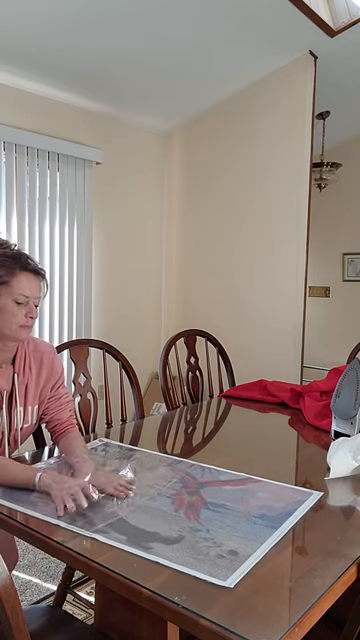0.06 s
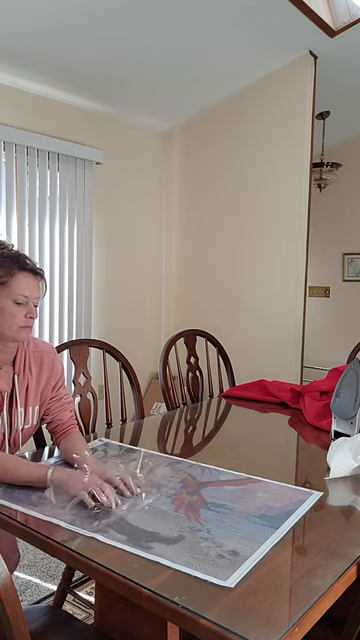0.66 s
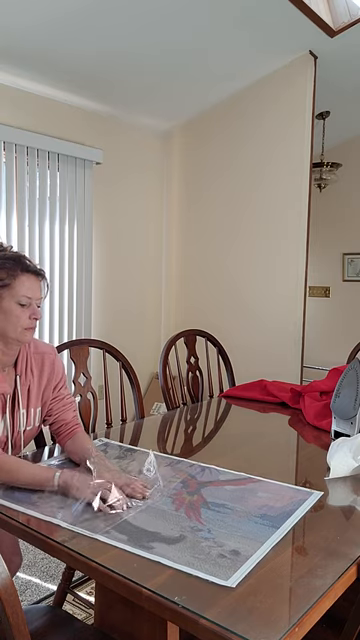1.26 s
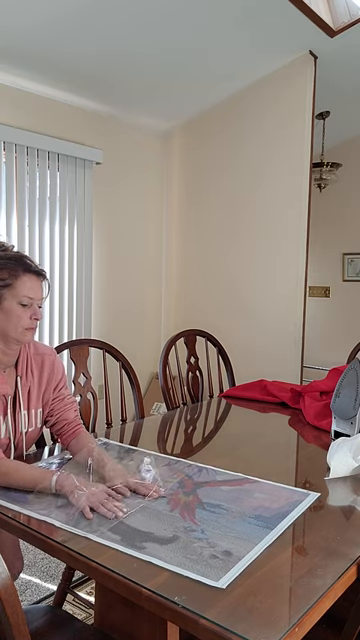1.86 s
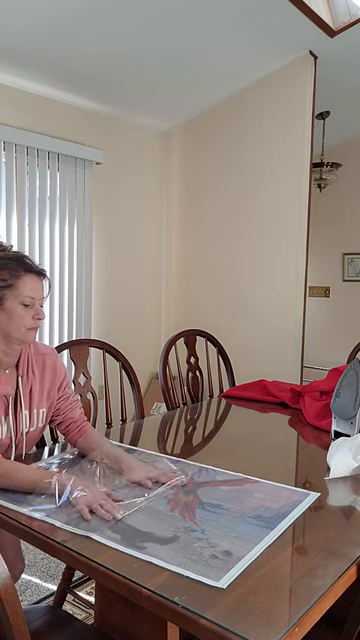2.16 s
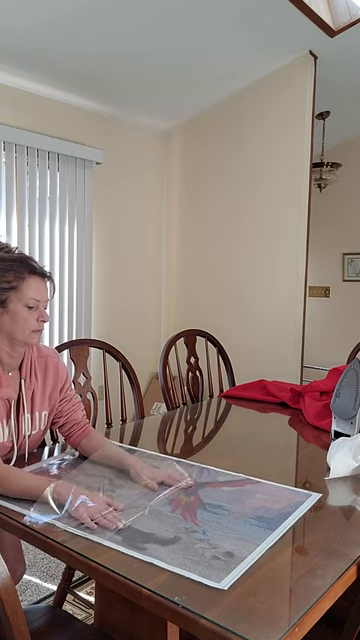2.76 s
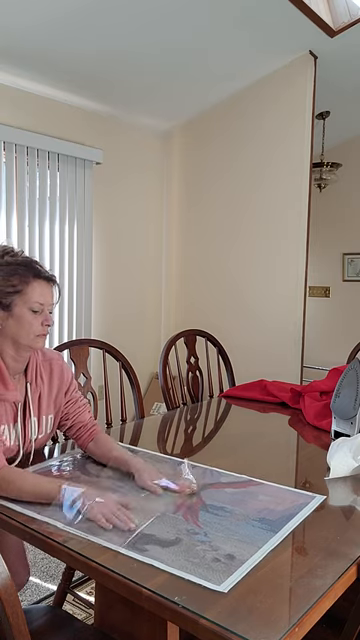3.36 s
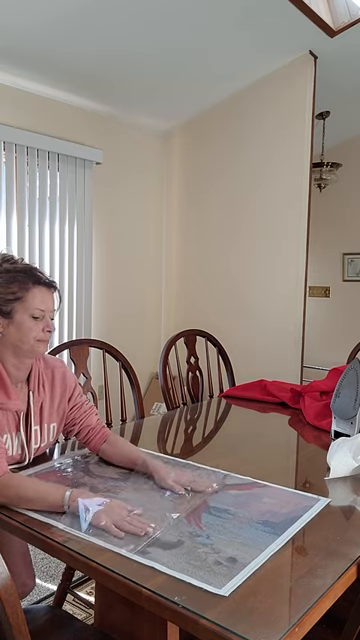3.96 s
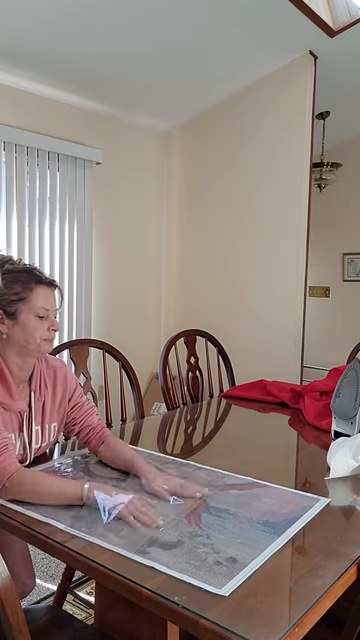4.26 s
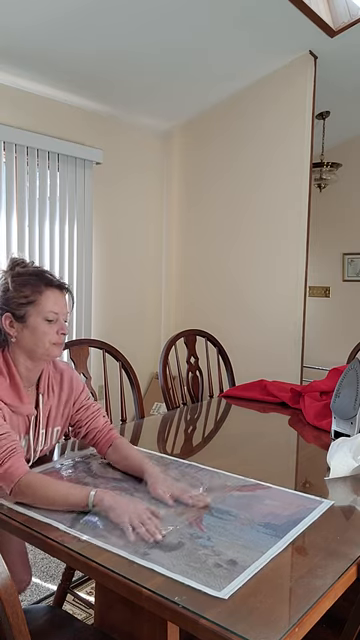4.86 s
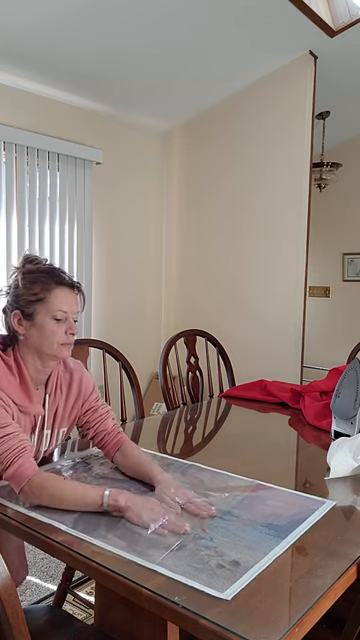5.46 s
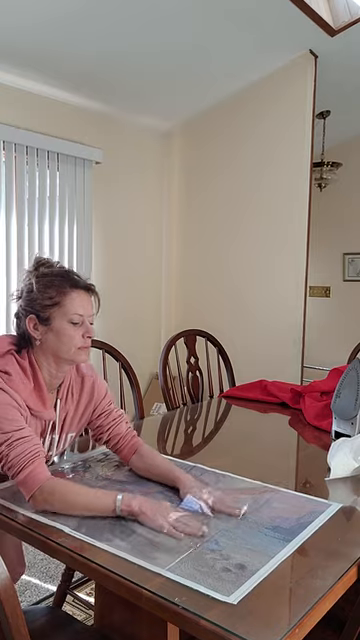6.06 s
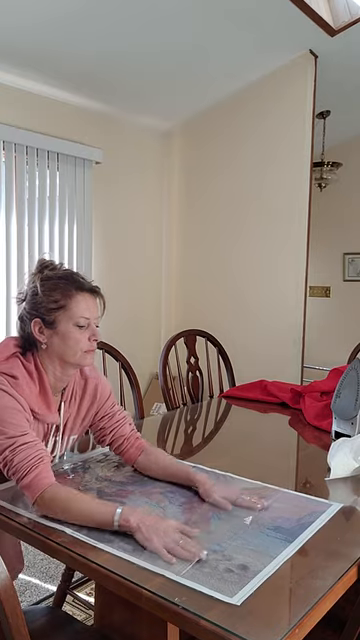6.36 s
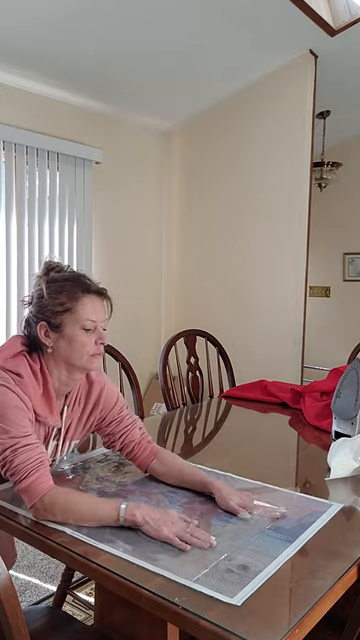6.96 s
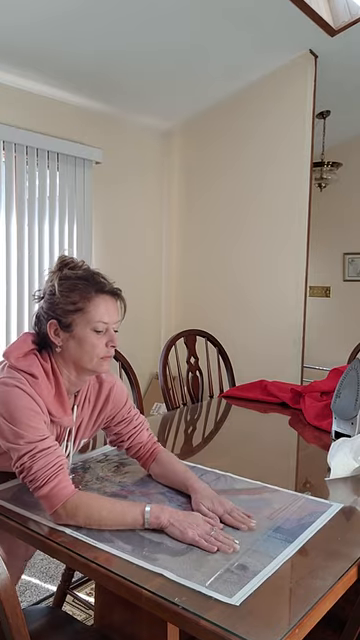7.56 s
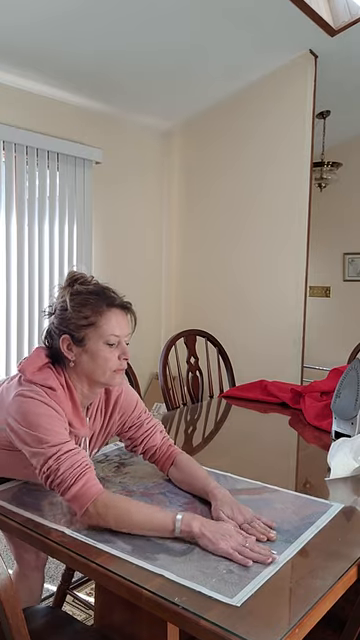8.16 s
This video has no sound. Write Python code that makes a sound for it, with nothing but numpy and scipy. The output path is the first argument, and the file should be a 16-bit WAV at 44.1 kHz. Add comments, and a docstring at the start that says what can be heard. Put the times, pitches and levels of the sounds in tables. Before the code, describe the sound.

Palms slide over plastic film in repeated rustling swishes, wrinkles crackling while the table beneath thuds faintly.

```python
"""Smoothing plastic film on a table

Two hands smooth clear film over a picture on a wooden dining table. Each stroke rubs out a soft swish
of tiny slips, wrinkles crackle under the palms, and now and then the film buckles with a snap.
The table thuds, sways and faintly creaks under the hands, and a bare, quiet room answers."""
import sys
import numpy as np
from scipy import signal
from scipy.fft import rfft, irfft, next_fast_len
from scipy.io import wavfile
from scipy.ndimage import uniform_filter1d, map_coordinates

SR = 44100
rng = np.random.default_rng(int(sys.argv[2]) if len(sys.argv) > 2 else 0)


def bounce(signal):
    """Save signal as a 16-bit WAV file at the path given by the first command-line argument."""
    frames = np.transpose(np.atleast_2d(signal))
    limited = np.clip(frames, -1, 1)
    pcm = np.round(limited * 32767).astype(np.int16)
    wavfile.write(sys.argv[1], SR, pcm)


N = 361796
TOP_HZ = 15950


def hand_strokes():
    """Each stroke gathers speed, slides and stops, driving the rub, crinkle, rumble and tick gains."""
    # Each row: start, rise and length in seconds, rub level in dB, crinkle and palm offsets in dB.
    strokes = [ (0.0, 0.0013, 0.0067, -45, 5, -18), (0.058, 0.014, 0.019, -45, -1.5, -31),
               (0.134, .018, 0.029, -45.5, -2, -30), (0.187, 0.013, 0.024, -43.5, 2.5, -19.5),
               (0.241, 0.062, 0.081, -41, 1.5, -19.5), (0.356, 0.03, 0.042, -47.5, 3.5, -16),
               (0.409, .03, 0.036, -42, -1.5, -22), (0.494, 0.029, 0.033, -44.5, -0.5, -18.5),
               (0.62, 0.034, 0.14, -58, -4.5, -21), (0.741, 0.04, 0.041, -40.5, 4, -22.5),
               (0.865, 0.041, 0.054, -40.5, 4, -25), (0.967, 0.019, 0.026, -39.5, 3.5, -25),
               (1.073, 0.036, 0.075, -47.5, -7, -23.5), (1.168, 0.025, .09, -54, -5, -14),
               (1.282, 0.12, 0.16, -45, 2, -20), (1.537, 0.009, 0.034, -54, 1, -19.5),
               (1.63, 0.034, 0.039, -57, 4, -31), (1.689, .012, 0.017, -48, 1.5, -32),
               (1.8, .01, 0.12, -60.5, 5, -28), (1.901, 0.016, 0.059, -43.5, -2, -27),
               (2.016, 0.041, 0.12, -38.5, 1, -25), (2.178, 0.017, 0.019, -48, 7, -15.5),
               (2.264, 0.063, 0.14, -42.5, -7.5, -27), (2.517, 0.071, 0.1, -44, -6, -25.5),
               (2.704, 0.013, 0.03, -41, -2.5, -33), (2.768, .015, .03, -47, -12, -24),
               (2.815, 0.032, 0.056, -38.5, -2, -23.5), (2.885, .02, 0.077, -53.5, 1, -15),
               (2.983, 0.12, 0.15, -39, -2.5, -25.5), (3.258, 0.083, 0.16, -42.5, -3.5, -29),
               (3.442, 0.05, 0.13, -49, -5, -26), (3.578, 0.016, 0.067, -44, -4, -26.5),
               (3.747, 0.079, 0.083, -39.5, -1, -27), (3.935, 0.011, 0.15, -43.5, -2.5, -28),
               (4.115, 0.017, 0.031, -50.5, -4, -36), (4.257, 0.067, 0.15, -45, -4.5, -32.5),
               (4.51, 0.063, 0.081, -48, -2.5, -41), (4.631, .018, 0.11, -48.5, -6, -27.5),
               (4.85, 0.014, .05, -50, -8, -27.5), (4.895, .035, 0.1, -47.5, -2, -27.5),
               (5.152, 0.075, 0.17, -46, -1.5, -28), (5.412, 0.0092, 0.074, -55.5, -6, -18),
               (5.493, 0.028, 0.063, -49, -3, -26), (5.65, 0.067, .16, -44, -2, -29.5),
               (5.824, .03, 0.082, -52, -2.5, -25), (6.048, .05, 0.16, -50.5, -4, -26.5),
               (6.282, 0.039, 0.059, -44, -1.5, -29), (6.368, 0.024, 0.054, -47, -1, -25.5),
               (6.564, 0.065, 0.36, -59, -18, -20.5), (6.683, 0.023, 0.043, -51, -7, -30),
               (6.743, 0.02, 0.078, -51, -10, -28), (6.906, 0.039, 0.13, -40.5, 0, -33),
               (7.244, 0.016, 0.17, -52.5, -6, -29), (7.456, 0.0074, 0.014, -48, -15, -30),
               (7.672, 0.055, 0.18, -55, -2, -16), (7.813, 0.078, 0.11, -54, -0.5, -24),
               (8.02, .03, .18, -83.5, -3, 10)]
    touch_s, swell_db, sag_db_per_s, stop_db_per_s = 0.0031, 12.5, 12, 158
    crinkle_growth, palm_growth = 1.28, 0.69  # dB for each dB of hand speed
    power, t = np.zeros((4, N)), np.arange(SR * 3 // 5) / SR
    crinkliest_db = max(row[3] + row[4] for row in strokes)
    for start, rise, length, db, crinkle_db, palm_db in strokes:
        rise_db = swell_db * np.maximum(1 - t / rise, 0)
        slowing_db = sag_db_per_s * t + stop_db_per_s * np.maximum(t - length, 0)
        speed = np.minimum(t / touch_s, 1) * amp(-rise_db - slowing_db)
        tick_db = -45 + 0.7 * (db + crinkle_db - crinkliest_db)  # ticks stand out in light strokes
        add(power[0], start, (amp(db) * speed) ** 2)
        add(power[1], start, (amp(db + crinkle_db) * speed ** crinkle_growth) ** 2)
        add(power[2], start, (amp(db + palm_db) * speed ** palm_growth) ** 2)
        add(power[3], start, (amp(tick_db) * speed ** crinkle_growth) ** 2)
    return np.sqrt(power)


def swish(rubbing, crinkling):
    """Skin slides in countless tiny slips: a mid swish from the palms, a bright fizz from the film."""
    # Tone of the palms and of the film. Each row: frequency in Hz, level in dB.
    rub_tone = [(100, -36), (330, -30.5), (520, -16.5), (690, -11), (900, -13), (1400, -4), (2100, 0),
                (2700, -4), (4200, -2.5), (5400, -6.5), (6500, -17.5), (7600, -15.5), (8800, -31.5),
                (15500, -29.5)]
    fizz_tone = [(200, -47.5), (900, -10.5), (2000, -5), (4200, 1.5), (5400, 3), (6500, -3), (7600, 1),
                 (8800, -8.5), (12000, -5), (15500, -8.5)]
    grip = wobble(110)  # the palms catch and let go
    rub = rubbing * amp(1.93 * grip) * coloured(grains(rate=5000, spread_db=3.5, size=N), rub_tone)
    fizz = crinkling * amp(2.2 * grip) * coloured(grains(rate=4000, spread_db=8, size=N), fizz_tone)
    return (room(rub, near_db=0.5, far_db=-8, near_t60=0.054)
            + room(fizz, near_db=-5.5, far_db=-1.5, near_t60=0.038))


def wrinkle_ticks(pitch_hz=6500, decay_cycles=0.6, spread_db=4.5, count=1000):
    """Small facets of film flick over, each ringing very briefly at its own pitch."""
    starts, n = rng.integers(0, N, count), np.arange(SR // 200)
    detune, size = np.clip(rng.standard_normal((count, 2)), -2.3, 2.3).T
    cycles = np.minimum(pitch_hz * np.exp(0.61 * detune), TOP_HZ)[:, None] * n / SR
    rings = amp(spread_db * size)[:, None] * np.sin(2 * np.pi * cycles) * np.exp(-cycles / decay_cycles)
    return unit(np.bincount((starts[:, None] + n).ravel(), rings.ravel(), N)[:N])


def snaps(ticks):
    """Among the ticks, a large wrinkle buckles with a sharp crack and sets off a run of smaller ones."""
    # Each row: start in seconds, level in dB, body offset in dB.
    buckles = [(0.2092, -25, -20), (0.621, -40, -17), (0.6858, -40, -16), (0.7711, -26, -17),
               (0.9173, -28, -6), (0.9944, -31, -10), (1.5484, -35, -14), (1.6831, -38, -11),
               (1.708, -32, -10), (1.8322, -39, -18), (1.924, -30, -13), (2.1241, -23, -19),
               (2.1564, -30, -17), (2.3845, -31, -10), (2.7217, -26, -18), (2.8459, -32, -9),
               (3.3524, -34, -6), (3.7783, -38, -2), (3.9475, -30, -8), (4.0672, -32, -17),
               (4.0966, -31, -20), (4.8623, -42, -2), (5.2735, -33, -3), (5.6416, -43, -7),
               (5.6615, -36, -5), (5.8124, -33, -17), (6.3056, -33, -14), (6.3265, -29, -19),
               (6.3385, -23, -22), (6.3424, -25, -21), (6.8079, -35, -11), (6.9192, -33, -10),
               (6.9414, -31, -19), (6.9511, -26, -15), (7.2784, -38, -16), (7.4644, -32, -7),
               (7.6804, -43, -15), (7.6964, -35, -16), (7.7054, -38, -17)]
    # A snap's bright edge and its midrange body. Each row: frequency in Hz, level in dB.
    edge_tone = [(300, -35), (2000, -9), (4200, 0), (5500, 0), (6500, -4), (7600, -3), (9000, -5.5),
                 (15500, -5.5)]
    body_tone = [(100, -24), (500, -27), (900, -10), (1400, 24), (2300, 20), (4000, 25), (8000, -33)]
    edge, body = np.zeros((2, N))
    t = np.arange(SR // 8) / SR
    for start, db, body_db in buckles:
        crack = unit(rng.standard_normal(len(t)) * t * amp(-60 * t / 0.002))
        crackle = unit(grains(rate=400, spread_db=2, size=len(t)) * amp(-60 * t / 0.017))
        burst = (crack + amp(-26) * crackle) / np.sqrt(len(t))
        add(edge, start, amp(db + 16.3) * burst)
        add(body, start, amp(db + body_db + 18) * burst)
    return coloured(edge + ticks, edge_tone) + coloured(body, body_tone)


def palm_rumble(pressing):
    """The table top rumbles dully under the sliding palms."""
    # Each row: frequency in Hz, level in dB.
    dull_tone = [(30, -12), (55, -0.5), (95, -3.5), (160, 2.5), (230, -4.5), (350, 7), (550, -2),
                 (1200, -14), (4000, -116)]
    rumble = pressing * coloured(rng.standard_normal(N), dull_tone)
    return rumble + amp(-4) * diffuse(reflections(rumble, t60=0.1))


def table_bumps():
    """Hands bump the top, damping it more or less: a low thud and a knock from its resonances."""
    # Each row: start in seconds, level in dB, pitch in Hz, time to fall 60 dB in seconds.
    bumps = [(0.233, -47, 172, .08), (0.552, -49, 157, 0.17), (0.66, -61.5, 162, 0.15),
             (0.993, -60, 369, 0.13), (1.221, -61.5, 133, 0.12), (1.329, -63, 152, 0.14),
             (1.41, -58.5, 181, 0.27), (2.088, -61, 194, 0.21), (3.846, -54.5, 348, 0.089),
             (4.769, -65, 131, 0.15), (5.253, -58.5, 127, 0.26), (5.273, -55.5, 238, 0.19),
             (5.397, -60.5, 143, .12), (7.583, -57.5, 131, 0.086), (7.796, -46, 296, 0.051),
             (7.818, -59.5, 179, 0.1)]
    # Resonances of the top. Each row: frequency in Hz, width in Hz, gain in dB.
    modes = [(136, 21, -10), (180, 24, 14), (278, 49, -3), (382, 15, -10), (663, 105, -3)]
    thuds, blows = np.zeros((2, N))
    t = np.arange(SR // 2) / SR
    for start, db, hz, t60 in bumps:
        envelope = amp(db) * (1 - np.exp(-t / 0.0065)) * amp(-60 * t / t60)  # flesh lands softly
        add(thuds, start, amp(4) * envelope * np.sin(2 * np.pi * hz * t))
        add(blows, start, amp(14.5) * envelope * rng.standard_normal(len(t)))

    def wood(hz):
        return sum((-1) ** k * amp(db) * 1j * hz * width / (centre ** 2 - hz ** 2 + 1j * hz * width)
                   for k, (centre, width, db) in enumerate(modes))
    return thuds + filtered(blows, wood)


def table_sways(t60=0.41):
    """A push rocks the whole table on its legs: a deep tone wrapped in rumble."""
    # Each row: start in seconds, level in dB, pitch in Hz.
    sways = [(0.219, -58, 46.3), (1.217, -63, 39.7), (1.561, -67, 40.2), (2.414, -52.5, 35.4),
             (3.201, -64, 39.8), (3.549, -63.5, 41.3), (4.19, -67, 39.4), (6.644, -62, 46),
             (7.016, -49, 43.7), (7.035, -58.5, 70.7), (7.835, -46.5, 53.3)]
    # Each row: frequency in Hz, level in dB.
    rumble_tone = [(20, -11), (45, -9), (75, 3), (110, -15), (200, -15), (600, -75)]
    tones, pushes = np.zeros((2, N))
    t = np.arange(SR // 2) / SR
    for start, db, hz in sways:
        swell = amp(db) * (1 - np.exp(-(t / 0.013) ** 2)) * amp(-60 * t / t60)
        add(tones, start, amp(7.5) * swell * np.sin(2 * np.pi * hz * t))
        add(pushes, start, amp(-4.5) * swell * rng.standard_normal(len(t)))
    return tones + coloured(pushes, rumble_tone, size=8192)


def table_creaks(rise_per_s=2.6, rough_db=0.5):
    """Wood creaks faintly in uneven slips that quicken under load."""
    # Each row: midpoint in seconds, level in dB, pitch in Hz, half length in seconds.
    creaks = [(8.041, -58.5, 287, 0.017), (8.11, -62.5, 264, 0.016), (8.159, -59, 540, 0.0052),
              (8.172, -72, 727, 0.019)]
    track, t = np.zeros(N), np.arange(SR // 2) / SR
    age = t - t.mean()
    for middle, db, hz, half in creaks:
        phase = 2 * np.pi * hz * (age + rise_per_s * age ** 2 / 2)
        tone = np.sin(phase) + 0.17 * np.sin(2 * phase) + 0.074 * np.sin(3 * phase)
        slips = amp(-rough_db * unit(uniform_filter1d(rng.standard_normal(len(t)), size=300)))
        swell = amp(db) * np.exp(-(age / half) ** 2 / 2)
        add(track, middle - t.mean(), swell * slips * tone)
    return track


def room(x, near_db, far_db, near_t60):
    """Direct sound from where the hands work, then one clear echo, quick reflections and the tail."""
    # The hands' position. Each row: time in seconds, lag of the left channel in samples.
    place = [(0, 5.35), (2.5, 4.42), (4.3, 4.7), (5.2, 5.24), (7.5, 6.3)]
    x = filtered(x, lambda hz: 1 + 0.07 * np.exp(-2j * np.pi * hz * 0.00285))  # a surface 0.5 m off
    lag = np.interp(np.arange(N) / SR, *np.transpose(place)) + 0.5 * wobble(4.025)
    direct = np.array([map_coordinates(x, [np.arange(N) - side * lag / 2], order=5) for side in (1, -1)])
    wet = amp(near_db) * reflections(x, near_t60) + amp(far_db) * tail(x)
    return (direct + diffuse(wet)) / np.sqrt(1 + amp(near_db) ** 2 + amp(far_db) ** 2)


def reflections(x, t60, count=121):
    """Quick reflections off table, arms and body, crossfading through random patterns as if in motion."""
    n, t = np.arange(N), np.arange(SR // 25) / SR
    wet, hop = np.zeros((2, N)), N // (count - 1)
    decay = amp(-60 * t / t60) * (t > 0.0006)
    for k in range(count):
        paths = unit(rng.standard_normal((2, len(t))) * decay) / np.sqrt(len(t))
        span = n[max(0, (k - 1) * hop):(k + 1) * hop]
        piece = x[span] * np.cos(np.pi / 2 * (span / hop - k))
        for channel, path in zip(wet, paths):
            add(channel, span[0] / SR, signal.fftconvolve(piece, path))
    return wet


def tail(x, size=256):
    """The walls store each band's energy and give it back as fading noise."""
    # Each row: frequency in Hz, time to fall 60 dB in seconds.
    decay_times = [(150, 1), (1500, 0.71), (5000, 0.36), (9000, 0.28), (15000, 0.078)]
    hz, t, bands = signal.stft(x, SR, nperseg=size)
    retained = amp(-120 * t[1] / along(decay_times, hz))
    stored = [signal.lfilter([0, 0, 1 - k], [1, -k], abs(band) ** 2) for k, band in zip(retained, bands)]
    noise = signal.stft(rng.standard_normal((2, N)), nperseg=size)[2]
    return signal.istft(noise / noise.std() * np.sqrt(stored), nperseg=size)[1][:, :N]


def diffuse(pair):
    """Two unrelated signals become sound from all around: centred in the bass, wide in the treble."""
    # Each row: frequency in Hz, left-right likeness from 0 to 1.
    likeness = [(100, 0.7), (450, 0.38), (1000, 0.22), (2000, 0.057), (4000, 0)]
    angle = lambda hz: np.arccos(along(likeness, hz)) / 2
    mid, side = filtered(pair, lambda hz: np.array([np.cos(angle(hz)), np.sin(angle(hz))]))
    return np.array([mid + side, mid - side])


def room_tone():
    """The low, steady air of the house."""
    # Each row: frequency in Hz, level in dB.
    air_tone = [(20, 0), (50, 0.5), (90, -5.5), (200, -15.5), (500, -14.5), (1500, -19), (5000, -18),
                (15500, -28)]
    air = filtered(rng.standard_normal((2, N)), lambda hz: amp(along(air_tone, hz)))
    return amp(-67.5) * unit(diffuse(air))


def grains(rate, spread_db, size):
    """Random tiny slips, rate a second, of log-normal strength."""
    hit = rng.random(size) < rate / SR
    strength = amp(spread_db * np.minimum(rng.standard_normal(size), 2.5))
    return unit(hit * strength * np.sign(rng.standard_normal(size)))


def wobble(rate):
    """A smooth random curve, rate knots a second."""
    return map_coordinates(rng.standard_normal(int(N * rate / SR) + 4), [np.arange(N) * rate / SR])


def coloured(x, spectrum, size=2048):
    """x through a causal filter of energy 1 with this spectrum."""
    cepstrum = irfft(np.log(amp(along(spectrum, np.fft.rfftfreq(size, 1 / SR)))))
    cepstrum[1:size // 2] *= 2
    cepstrum[size // 2 + 1:] = 0
    kernel = irfft(np.exp(rfft(cepstrum)))
    return signal.oaconvolve(x, kernel / np.linalg.norm(kernel))[:N]


def filtered(x, response):
    """x shaped by a frequency response."""
    size = next_fast_len(N + SR // 2)
    return irfft(rfft(x, size) * response(np.fft.rfftfreq(size, 1 / SR)), size)[..., :N]


def along(points, hz):
    """Interpolate (Hz, value) points on a log axis."""
    knots_hz, values = np.transpose(points)
    return np.interp(np.log(hz + 1), np.log(knots_hz + 1), values)


def add(track, start_s, sound):
    """Mix a sound into a track."""
    part = track[max(0, round(start_s * SR)):][:len(sound)]
    part += sound[:len(part)]


def amp(db):
    """Decibels to gain."""
    return 10 ** (np.asarray(db) / 20)


def unit(x):
    """Scaled to rms 1."""
    return x / np.sqrt(np.mean(x ** 2) + 1e-20)


def scene():
    """The film up front and a touch to the right, the table beneath it, the room behind."""
    rubbing, crinkling, pressing, ticking = hand_strokes()
    film = swish(rubbing, crinkling)
    film += room(snaps(ticking * wrinkle_ticks()), near_db=-7, far_db=-2, near_t60=0.03)
    table = table_bumps() + table_sways() + table_creaks() + palm_rumble(pressing)
    return film * amp([[-0.3], [0.3]]) + table + room_tone()


def record(dry):
    """A steep cut takes off the highest treble."""
    return filtered(dry, lambda hz: hz < TOP_HZ)


dry = scene()
out = record(dry)
bounce(out)
```